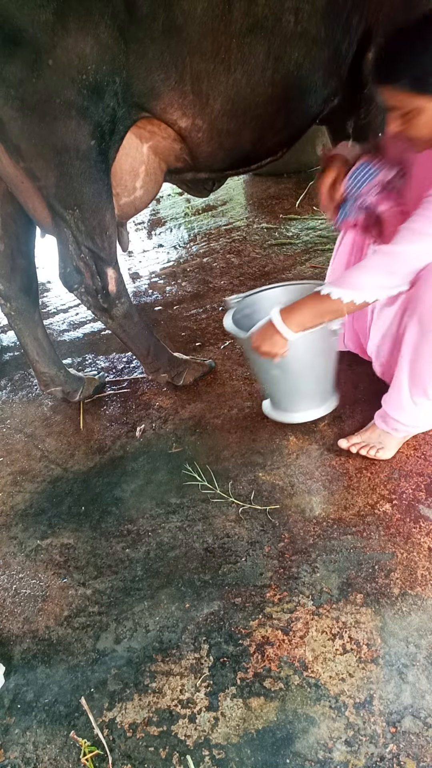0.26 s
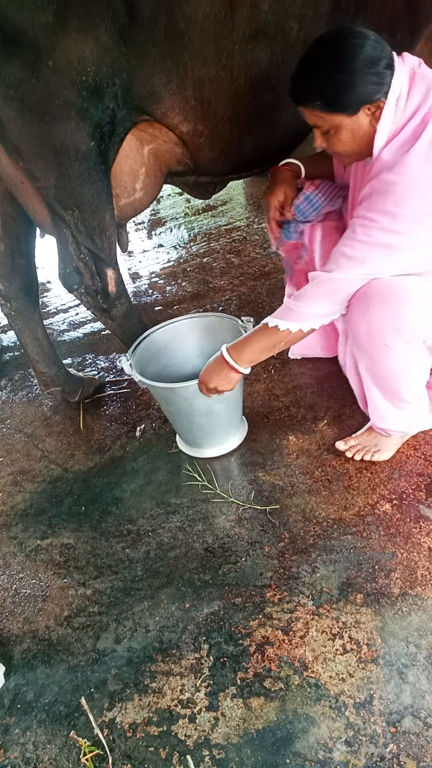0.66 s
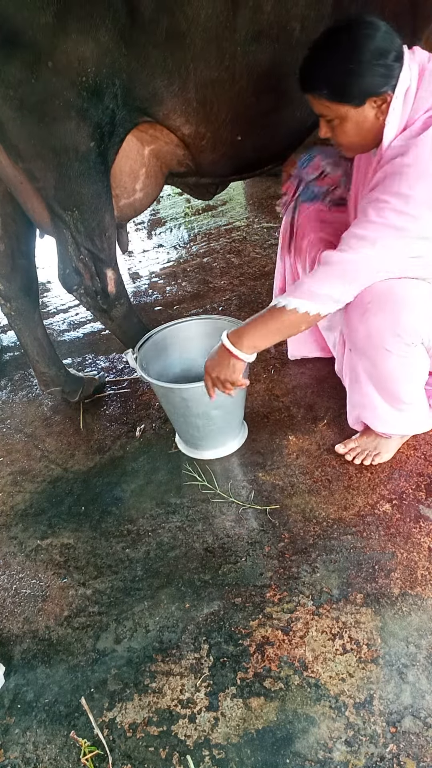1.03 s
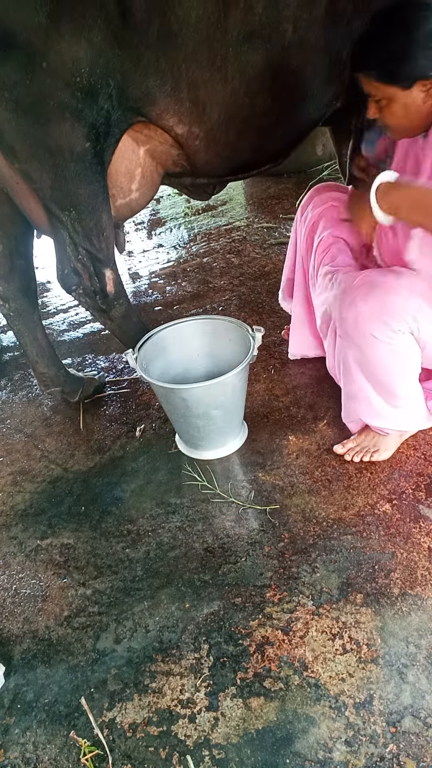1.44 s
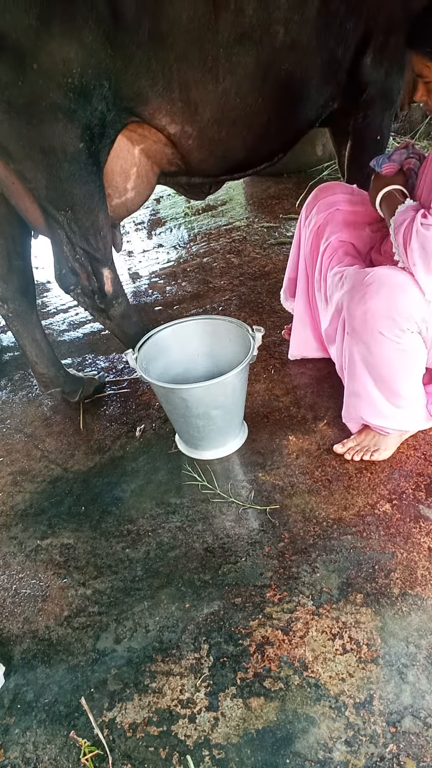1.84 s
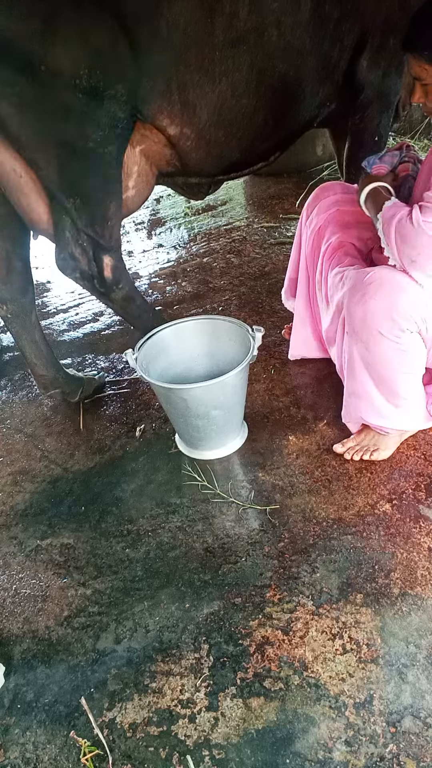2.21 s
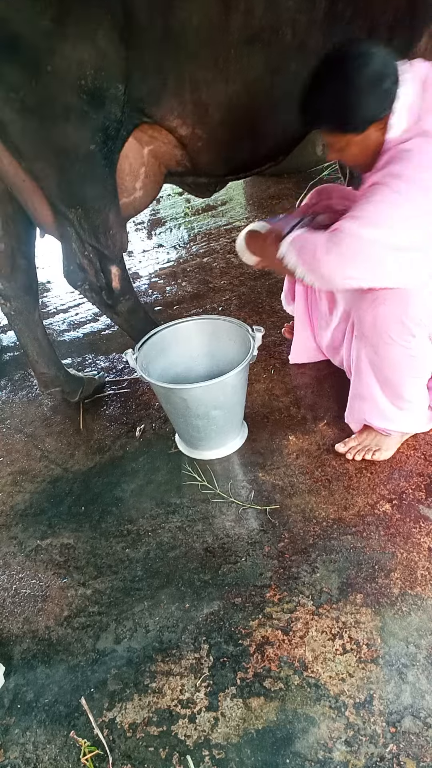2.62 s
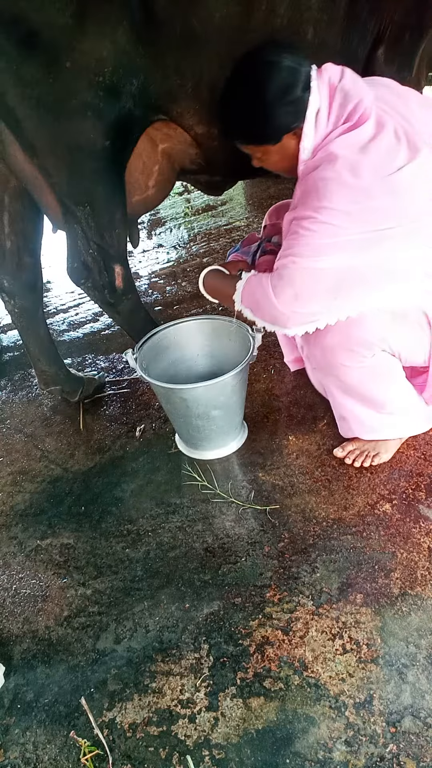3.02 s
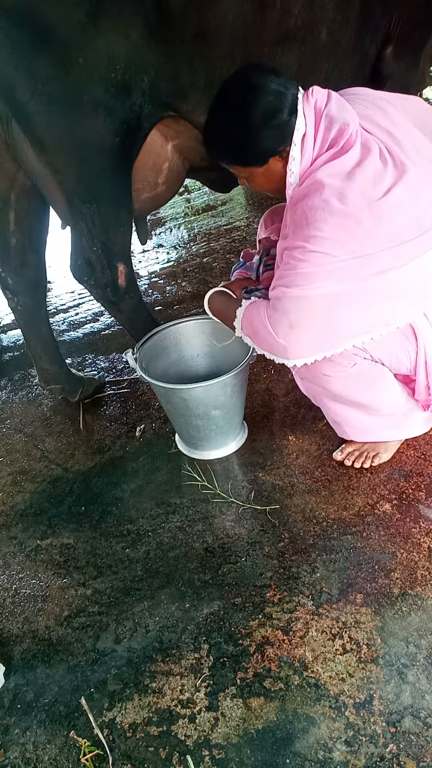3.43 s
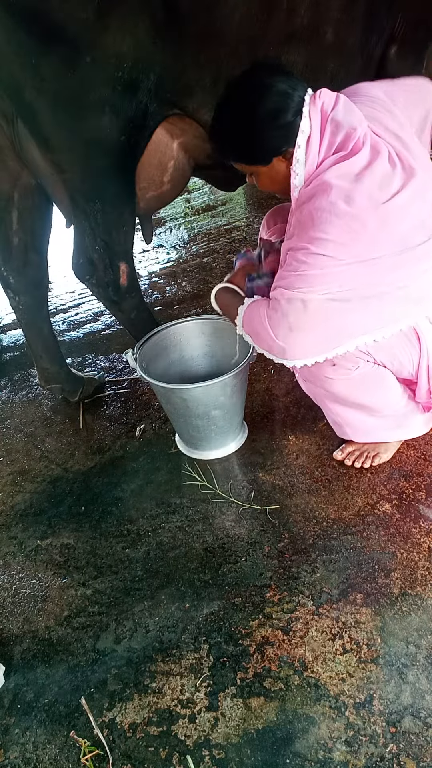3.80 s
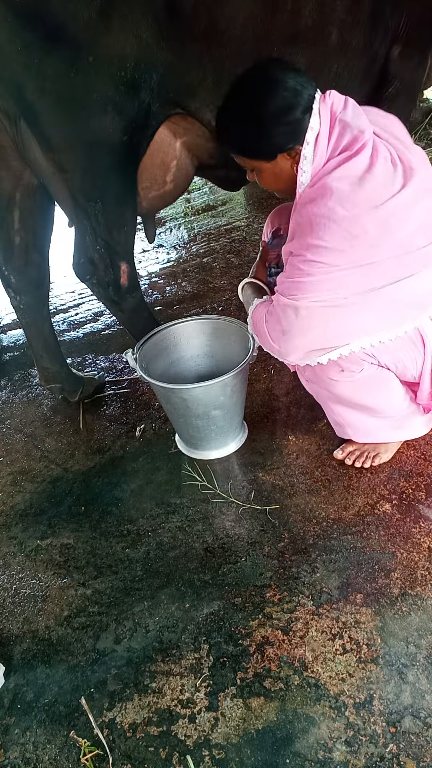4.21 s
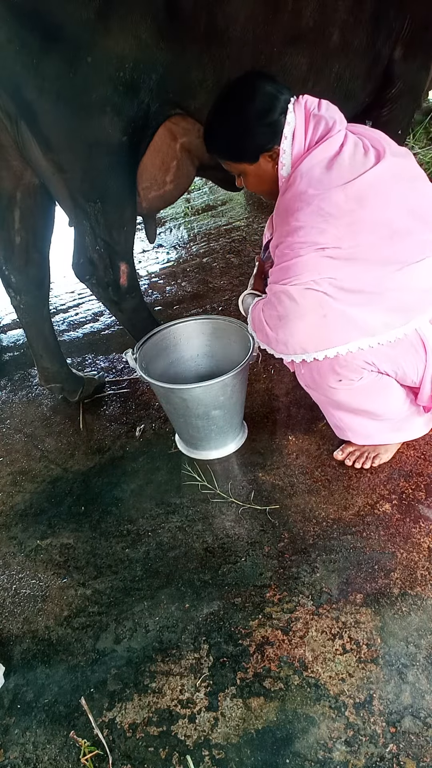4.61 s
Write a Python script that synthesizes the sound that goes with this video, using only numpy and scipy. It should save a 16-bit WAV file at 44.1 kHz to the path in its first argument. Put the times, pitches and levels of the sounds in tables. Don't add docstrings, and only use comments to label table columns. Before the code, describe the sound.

A close, mono phone pickup in an open animal shed with a wet stone floor and faint, patchy air noise. Around 0.2 s a thin steel pail touches down with soft, hand-damped metallic taps. A wooden stool knocks sharply at 0.36 s, then drags in a stuttering, hollow groan with gritty scraping and knocks until about 0.65 s. At 0.74 s the pail drops with a hard, bright clang, strikes strongly again near 0.95 s, and rocks with diminishing clanks until 1.5 s. From 1.6 to 2.8 s it is quiet: tiny bangle ticks, cloth rustle, faint scuffs and soft low thumps of shifting weight. From about 2.97 to 3.45 s the wood groans and judders again with several knocks, duller and without the big metal clang. Afterwards only faint scrapes, ticks and soft bumps remain, with a small shuffle at 4.3 to 4.7 s.

```python
import sys
import numpy as np
from scipy import signal
from scipy.fft import rfft, irfft, next_fast_len
from scipy.io import wavfile
from scipy.ndimage import uniform_filter1d, map_coordinates

SR = 44100
rng = np.random.default_rng(int(sys.argv[2]) if len(sys.argv) > 2 else 0)


def invert_db(level):
    return 10 ** (np.asarray(level, dtype=float) / 20)


def wav_out(sig):
    wavfile.write(sys.argv[1], SR, np.round(np.clip(np.atleast_2d(sig).T, -1, 1) * 32767).astype(np.int16))


N = 214142

# t/s, clang level/dB, boom/dB over it, edge/dB over it, thud f/Hz
PAIL_LANDING = [
    (0.1785, -37.5, 3, -0.5, 325),
    (0.1974, -44, 23, -16, 206),
    (0.2154, -35.5, 19, -9, 293),
    (0.2394, -48.5, 22.5, -4, 335),
    (0.738, -15, 8, -4, 351),
    (0.7445, -6.5, 3, -8.5, 718),
    (0.7574, -24, 4, -31, 322),
    (0.8344, -29.5, 4, -25, 324),
]
# t/s, clang level/dB, boom/dB over it, edge/dB over it, thud f/Hz
PAIL_ROCKING = [(0.9421, -24, 16, -28, 489), (0.9483, -7.5, -10, -2, 435), (0.9576, -19.5, 11.5, -29, 454),
                (1.0294, -30, 6, 3.5, 436), (1.067, -16.5, 2, -34, 410), (1.0698, -22.5, 5.5, -6, 317),
                (1.0795, -19, 0, -2.5, 340), (1.1744, -26, 4.5, -12, 268), (1.1864, -23.5, 3.5, -4, 372),
                (1.219, -30, 9, -20, 330), (1.2972, -36.5, 13.5, -28, 344), (1.3172, -36.5, 12, -29, 327),
                (1.3433, -58, 33, -24, 322), (1.3842, -43, 17.5, -26, 292), (1.4592, -38, 5.5, -4, 353)]
# f/Hz, level/dB, t60/s
WALL_HELD = [(339, -2, 0.33), (732, -7, 0.34), (845, -5, 0.19), (1100, -6, 0.12), (1292, -20, 0.29),
             (1400, -5, 0.097), (1674, -15, 0.27), (1960, -16, 0.17), (2358, -12, 0.25), (2778, -11, 0.2),
             (2923, -12, 0.18), (3133, -18, 0.3), (3300, -12, 0.23), (3461, -25, 0.39), (3601, -11, 0.19),
             (4032, -13, 0.14), (4258, -14, 0.12), (4603, -22, 0.2), (4732, -21, 0.2), (4861, -13, 0.089),
             (5098, -27, 0.28), (5809, -26, 0.2)]
WALL_FREE = [(329, -8, .4), (364, -14, .3), (465, -9, .22), (1023, -21, .3), (812, -21, .22),
             (847, -17, .3), (1099, -12, .22), (1380, -20, .3), (1464, -23, .25), (1671, -17, .22),
             (1922, -21, .25), (1992, -17, .2), (2120, -16, .12), (2345, -14, .18), (2621, -13, .2),
             (2826, -20, .22), (2885, -21, .2), (3009, -23, .25), (3230, -19, .18), (3300, -21, .18),
             (3709, -22, .12), (3876, -21, .2), (4124, -20, .12), (4215, -25, .17)]
# f/Hz, level/dB per Hz
CLANG_HELD = [(88, -65), (150, -16), (335, 16.5), (548, 1), (735, -1.5), (1020, -24), (1080, -22),
              (1540, -25.5), (1640, -37), (3240, -15.5), (6000, -31.5), (7800, -68), (13200, -120)]
CLANG_FREE = [(88, -52), (150, -25.5), (463, -11.5), (611, -32.5), (832, -14.5), (941, -38), (1100, -15),
              (1210, -34), (2380, -19.5), (4020, -24), (6000, -33), (7800, -59), (13200, -120)]
# f/Hz, t60/s
STEEL_T60 = [(200, 0.32), (1000, 0.37), (3000, 0.19), (8000, 0.18), (15000, 0.18)]
# f/Hz, t60/s
WOOD_T60 = [(200, 0.2), (1000, 0.23), (3000, 0.14), (8000, 0.072), (15000, 0.14)]
# f/Hz, level/dB per Hz
SPARK = [(2650, 23), (4500, 0), (5360, -1.5), (6460, -3.5), (7800, -3.5), (8830, 4), (10000, -14.5),
         (12400, -18), (13400, -13), (16000, -13)]
# t/s, crack level/dB, boom/dB
# over it, edge/dB over it, thud f/Hz
LEGS = [(0.2602, -17.5, -1.5, -18, 324), (0.3588, -4, 1.5, -22.5, 606), (0.4255, -26.5, 10, -10, 634),
        (0.4544, -16.5, -18, -11, 600), (0.4725, -13.5, -18, -11, 570), (0.4974, -14, -18, -9.5, 506),
        (0.5442, -17, 0, -7.5, 592), (0.6008, -21, 1, -11, 585), (0.6257, -17.5, 7.5, -10.5, 596),
        (0.6494, -28.5, -18, -9, 660),
        (2.8001, -34, 7, -22, 438), (2.9675, -56, 16, -22, 600), (3.0153, -44, 21, -23, 544),
              (3.0696, -11, 4, -38, 607), (3.078, -18, -9, -34, 680), (3.0926, -25, -6, -34, 596),
              (3.0997, -22, 7, -26, 592), (3.107, -20.5, 16, -24, 565), (3.1814, -12.5, -2, -16, 648),
              (3.244, -20.5, -3, -9, 377), (3.276, -13, -6, -15.5, 792), (3.3317, -42, 18.5, 2, 245),
              (3.4094, -40.5, 15, -7, 762), (3.4244, -47, 25.5, -29, 698), (3.5901, -29.5, 2, -19, 236),
              (4.4545, -25.5, -1.5, -3.5, 660), (4.6905, -39, 11.5, -4, 232)]
# f/Hz, level/dB per Hz
KNOCK = [(88, -51), (150, -21), (231, -33), (367, 3.5), (621, -3), (1050, -4), (1500, -14.5), (2130, -8),
         (4990, -36.5), (6000, -68), (7800, -68), (13200, -120)]
# f/Hz, width/Hz, level/dB
SEAT = [(223.5, 13, -13.5), (592, 110, -1.5), (955, 19, -1), (2206, 13, 20.5), (2500, 99, -38),
        (3620, 31, -19)]
# f/Hz, level/dB per Hz
SCRAPE = [(530, -24), (900, 18), (974, -39), (1240, 6), (2470, -5.5), (3850, -7.5), (4920, -25.5),
          (6000, -68), (7800, -64), (13200, -120)]
# start t/s,
# hold/s, scrape level/dB, groan/dB over it, rumble/dB over it
STROKES = [(0.216, 0.018, -35, -24, 10.5), (0.279, 0.009, -35, -16, -20), (0.372, 0.11, -28, 4, -5),
           (0.482, 0.067, -20, 3.5, -0.5), (0.617, 0.042, -24, 5.5, -5.5), (0.035, 0.032, -49, -7, 7),
           (1.975, 0.064, -43.5, -9, -11), (2.192, 0.023, -43.5, -3, -17), (2.29, 0.029, -47, -16, -13),
           (2.65, 0.085, -57.5, 7.5, 15), (3.827, 0.054, -44.5, -9, -10), (4.024, 0.082, -45, -2, -11),
           (1.668, 0.029, -41.5, -5, -6), (2.42, 0.015, -41, -21, -22), (2.795, 0.069, -47.5, 10, 6.5),
           (2.978, 0.016, -38, 13.5, 3), (3.01, 0.055, -28, 10, -9), (3.083, 0.072, -27, 13, -4),
           (3.223, 0.027, -26.5, -18, -2), (3.287, 0.0075, -36.5, 5, 5), (3.314, 0.11, -45, -28, -1),
           (3.409, 0.011, -43.5, 10, 18.5), (3.446, 0.088, -54.5, 5, 17), (3.609, 0.053, -41, -2, 10),
           (3.933, 0.011, -34.5, -5.5, -5.5), (4.275, 0.064, -44, 10, -13), (4.388, 0.059, -51.5, 10, 17),
           (4.552, 0.0066, -44, 5.5, -6)]
# t/s, level/dB, f/Hz
JOLTS = [(0.3737, -23, 706), (0.3842, -31, 720), (0.3918, -32, 800), (0.3978, -17, 935),
         (0.407, -25, 590), (0.4233, -20, 635), (0.429, -32, 636.0), (0.4376, -28, 670),
         (0.4511, -29, 673.0), (0.4582, -21, 760), (0.4639, -14, 630), (0.473, -12, 575),
         (0.4836, -11.5, 617), (0.4933, -13, 730), (0.4978, -7, 630), (0.5032, -6.5, 480),
         (0.5092, -16, 705), (0.5176, -10.5, 520), (0.5247, -22, 650), (0.5307, -12, 610),
         (0.5361, -16, 700), (0.5414, -8, 553), (0.5497, -6, 577), (0.5557, -33, 547),
         (0.5612, -15, 655), (0.5663, -17, 660), (0.571, -27, 585), (0.5789, -16.5, 435),
         (0.5887, -19, 567), (0.5994, -14.5, 800), (0.6043, -25, 674), (0.61, -27, 780),
         (0.6154, -16, 656), (0.624, -18, 740), (0.6312, -28, 680), (0.6389, -17, 667),
         (0.6462, -19, 580), (0.6523, -25, 590), (0.6584, -20, 620),
         (2.967, -11, 535), (2.9743, -15.5, 640), (2.9791, -22, 603), (2.9889, -12.5, 464),
               (2.9945, -12, 608), (3.0056, -9.5, 510), (3.0147, -8, 563), (3.0202, -3.5, 586),
               (3.0262, -8, 536), (3.0317, -11, 656), (3.0365, -6, 584), (3.0437, -5.5, 597),
               (3.0521, -11.5, 620), (3.0621, -10.5, 640), (3.0685, -3.5, 580), (3.0763, -12.5, 813),
               (3.0847, -9, 695), (3.0907, -1, 550), (3.0983, -14, 660), (3.1069, -6, 560),
               (3.1154, -18, 596), (3.1211, -16, 620), (3.1288, -13, 654), (3.1344, -9, 800),
               (3.1397, -15, 680), (3.1473, -9, 628), (3.1539, -23, 765), (3.1932, -19, 760),
               (3.2076, -35, 670), (3.218, -34, 830), (3.2247, -19, 606), (3.2351, -23, 730),
               (3.2429, -21, 800), (3.2538, -25, 505), (3.2594, -20, 544), (3.2673, -32, 543),
               (3.4114, -21.5, 610), (3.418, -22.5, 660), (3.4233, -20, 574), (3.4367, -32, 527),
         (4.276, -37, 600), (4.2809, -41, 800), (4.2912, -29, 620), (4.297, -31, 590),
              (4.3114, -36, 594), (4.326, -32, 630), (4.3337, -36, 693), (4.3771, -33, 630),
              (4.3947, -26.5, 533), (4.3993, -26.5, 483), (4.409, -33, 526), (4.414, -35, 460),
              (4.426, -33, 387), (2.801, -35, 640), (2.81, -34, 503), (2.826, -37, 580),
              (3.622, -26.5, 533), (3.639, -26, 417)]
# t/s, level/dB, f/Hz
STOOL_ROCKS = [(0.499, -45, 264), (0.529, -24.5, 135), (.543, -24, 211), (2.969, -35, 215),
               (2.99, -32, 220), (3.015, -23, 202), (3.047, -21, 200), (3.078, -27.5, 205),
               (3.098, -16, 206), (3.112, -20, 212), (3.149, -28, 216), (3.008, -15.5, 380.6),
               (3.03, -23, 383), (3.099, -19.5, 333), (3.249, -22.5, 382)]
# t/s, level/dB, f/Hz
SNAPS = [(.3604, -2, 680), (.6262, -9, 1000), (.4856, -10, 1300), (.4992, -10, 1000), (.6009, -14, 1400),
         (3.2443, -17, 1800), (3.2767, -15, 1800), (.9493, -7, 520), (1.0714, -14, 400), (.95, -12, 3000),
         (1.7193, -42, 13000), (1.7712, -45, 11000), (2.5415, -44, 14500), (1.851, -46, 6000),
         (3.0681, -41, 6500), (3.1035, -40, 6500), (3.2756, -28, 9000)]
# t/s, level/dB, f/Hz, t60/s
CLEAR_TONES = [(1.074, -21, 331, .3), (1.066, -30, 560, .15), (.7372, -11, 735, .1), (.18, -38, 835, .4),
               (.178, -42, 2400, .3), (2.685, -53, 1980, .9), (.211, -27, 820, .2), (1.028, -34, 6000, .05),
               (1.029, -39, 7100, .04), (1.032, -36, 4570, .08), (3.44, -40, 248, .5), (1.21, -43, 1098, .9),
               (1.3, -40, 807, .25)]
# t/s, level/dB, f/Hz
TICKS = [(0.135, -39, 9130), (0.236, -25, 8600), (0.519, -27, 15500), (0.746, -32, 5270),
         (1.029, -29, 6050), (1.649, -37.5, 8200), (1.7174, -39, 8900), (1.8132, -33.5, 8690),
         (1.8962, -32, 9600), (1.9634, -41, 15000), (1.896, -30, 15100), (2.191, -31.5, 15500),
         (2.304, -38, 8550), (2.541, -37, 15200), (2.576, -40.5, 8560), (3.1823, -20.5, 15000),
         (3.277, -35, 5230), (3.812, -34, 8400), (3.9377, -34.5, 8490), (4.381, -37, 12000),
         (4.6912, -55, 8600)]
# t/s, level/dB, f/Hz
HOOVES = [(0.016, -30, 93), (0.146, -33, 79), (0.42, -28.5, 132), (0.518, -25, 160), (0.593, -24.5, 181),
          (1.063, -21, 212), (1.16, -28, 198), (1.247, -25.5, 242), (1.654, -40, 107), (1.888, -37, 66),
          (1.972, -36.5, 108), (2.006, -37, 72), (2.1, -47, 72), (2.303, -37, 80.7), (2.879, -49, 77),
          (3.276, -29.5, 115), (3.329, -37, 61.9), (3.39, -33, 100), (3.597, -42, 220), (3.625, -41, 231),
          (4.02, -41.5, 431), (4.064, -41, 252), (2.098, -40, 276), (1.841, -42, 142), (0.278, -31, 337),
          (0.627, -31.5, 87), (1.169, -40, 66), (3.288, -27, 251), (3.345, -28, 245), (2.893, -39, 302),
          (3.864, -31, 74), (4.314, -43, 110), (4.38, -34.5, 106), (4.689, -34.5, 169)]
# t/s, level/dB
STIR = [(0.0, 4.5), (0.16, 3), (0.9, 1.5), (1.5, -1), (1.7, -0.5), (1.838, 0), (1.968, 0.5), (2.112, -1),
        (2.318, 1.5), (2.566, -1), (2.75, 4), (2.95, -0.5), (3.75, 0), (3.894, 1), (4.128, -2.5),
        (4.306, -2), (4.45, 2), (4.856, 2)]
# f/Hz, level/dB per Hz
AIR = [(15, -41), (25, -32), (59, -0.5), (97, 1.5), (170, -11), (335, -7.5), (677, -12.5), (887, -14),
       (1160, -15), (2840, -9.5), (6560, -30), (7800, -24), (8830, -15.5), (9700, -26.5), (11800, -30.5),
       (14800, -22), (16000, -17.5)]
# level/dB, share of the stir followed
SHED_LAYERS = [
    (-58.5, 0.57),
    (-52, 0.45),
    (-60, 0.74),
    (-60, 1.33),
]

LOW_TOP_HZ, MID_TOP_HZ, HIGH_TOP_HZ = 1300, 5000, 18000


def unit(x):
    return x / np.sqrt(np.mean(x ** 2) + 1e-20)


def along(points, hz):
    f, v = np.transpose(points)
    return np.interp(np.log(hz + 1), np.log(f + 1), v)


def wobble(rate):
    return map_coordinates(rng.standard_normal(int(N * rate / SR) + 4), [np.arange(N) * rate / SR])


def filtered(x, response):
    m = next_fast_len(len(x) + 8192)
    return irfft(rfft(x, m) * response(np.fft.rfftfreq(m, 1 / SR)), m)[:len(x)]


def band(hz, lo_hz, hi_hz):
    return 1 / np.sqrt((1 + (lo_hz / (hz + 1)) ** 6) * (1 + (hz / hi_hz) ** 6))


def place(out, s, sound):
    out[round(s * SR):][:len(sound)] += sound


def ring_modes(t, modes, ring_db, boom_db):
    out = np.zeros(len(t))
    chances = rng.standard_normal((len(modes), 3))
    for (f, level, t60), (luck, turn, split) in zip(modes, chances):
        beat = 1 + 0.3 * np.cos(2 * np.pi * 0.008 * f * split * t + 3 * turn)
        boom = (0.78 * boom_db - 3.5) * (f < LOW_TOP_HZ)
        strength_db = ring_db + level + boom + 2 * luck
        drifted_hz = f * (1 + 0.001 * turn)
        out += invert_db(strength_db - 60 * t / min(t60, 0.4)) * beat * np.sin(2 * np.pi * drifted_hz * t)
    return out


def blows(events, modes, colour, t60s, ring_db, dense_db, crack_db, thud_db, thud_t60, damping,
          low_db, high_db, snap_db, snap_hz, contact_s):
    out, t = np.zeros(N + SR), np.arange(SR // 3) / SR
    mode_gap_hz = 45
    crowd = rng.standard_normal(SR // mode_gap_hz)

    def coloured(white, shape, lo, hi):
        def response(hz):
            modal_db = 3 * map_coordinates(crowd, [hz / mode_gap_hz]) * (hz > LOW_TOP_HZ)
            return invert_db(along(shape, hz) + modal_db) * band(hz, lo, hi)
        return unit(filtered(white, response))

    u = 2 * np.pi * snap_hz * t - np.pi
    snap = -invert_db(snap_db) * u * np.exp(-u ** 2 / 2)
    for s, db, boom_db, edge_db, thud_hz in events:
        white = rng.standard_normal(len(t))
        low = invert_db(low_db + boom_db) * coloured(white, colour, 60, LOW_TOP_HZ)
        mid = coloured(white, colour, LOW_TOP_HZ, MID_TOP_HZ)
        high = invert_db(high_db + edge_db) * coloured(white, SPARK, MID_TOP_HZ, HIGH_TOP_HZ)

        hz, when, z = signal.stft(low + mid + high, SR, nperseg=128)
        decay = invert_db(-60 * when / along(t60s, hz)[:, None])
        dense = signal.istft(z * decay, SR, nperseg=128)[1][:len(t)]

        thud_fall_db = 60 * t / thud_t60 * (thud_hz / 330) ** damping
        thud = invert_db(thud_db + boom_db - thud_fall_db) * np.sin(2 * np.pi * thud_hz * t)
        sound = invert_db(dense_db) * dense + thud + ring_modes(t, modes, ring_db, boom_db)

        contact = contact_s * invert_db(0.082 * boom_db)
        rise = 1 - np.exp(-t / max(contact, 1e-4))
        crack = invert_db(crack_db - 60 * t / 0.0096) * (mid + high) * np.minimum(t / 0.0006, 1)
        place(out, s, invert_db(db) * (sound * rise + crack + snap))
    return out[:N]


def pail():
    held = blows(PAIL_LANDING, WALL_HELD, CLANG_HELD, STEEL_T60, ring_db=-12.5, dense_db=-17,
                 crack_db=-15.5, thud_db=2.5, thud_t60=0.063, damping=0, low_db=0.5, high_db=7.5,
                 snap_db=-15, snap_hz=1470, contact_s=0.0011)
    free = blows(PAIL_ROCKING, WALL_FREE, CLANG_FREE, STEEL_T60, ring_db=-4, dense_db=-18.5,
                 crack_db=-16.5, thud_db=1.0, thud_t60=0.1, damping=0.81, low_db=4.5, high_db=3.5,
                 snap_db=-23, snap_hz=1480, contact_s=0.0013)
    return held + free


def stool_knocks():
    return blows(LEGS, [], KNOCK, WOOD_T60, ring_db=0, dense_db=-14.5,
                 crack_db=-9.5, thud_db=-8.0, thud_t60=0.14, damping=0, low_db=-4.5, high_db=4.5,
                 snap_db=-4.5, snap_hz=1130, contact_s=0.0014)


def slips(rate, spread_db):
    chance, size = rng.random(N), rng.exponential(size=N)
    return (chance < rate / SR) * invert_db(spread_db * size) * rng.standard_normal(N)


def seat_response(f):
    total = 0
    for k, (centre, width, db) in enumerate(SEAT):
        resonance = 1j * f * width / (centre * centre - f * f + 1j * f * width)
        total = total + (-1) ** k * invert_db(db) * resonance
    return total


def pressure():
    t, force = np.arange(N) / SR, np.zeros((4, N))
    for s, hold, db, groan_db, rumble_db in STROKES:
        press_db = 906 * (t - s)
        ease_db = 333.5 * (s + hold - t)
        shape_db = np.minimum(0, np.minimum(press_db, ease_db))
        force += invert_db(db - 8.0 + shape_db) * invert_db([[groan_db], [rumble_db], [0], [-15]])
    return uniform_filter1d(force, size=130, axis=1)


def stool_drag():
    judder = unit(slips(700, 0.99)) + 1.18 * rng.standard_normal(N)
    groan = unit(filtered(judder, lambda hz: (seat_response(hz) + 0.56) * band(hz, 480, 580)))
    rumble = unit(filtered(judder, lambda hz: (seat_response(hz) + 0.057) * band(hz, 145, 245)))

    grit = unit(slips(2500, 2.5)) + 0.98 * rng.standard_normal(N)
    grit = grit * invert_db(3 * wobble(90))
    scrape = unit(filtered(grit, lambda hz: invert_db(along(SCRAPE, hz)) * band(hz, LOW_TOP_HZ, MID_TOP_HZ)))
    fine = unit(filtered(np.tanh(grit / 4),
                         lambda hz: invert_db(along(SPARK, hz)) * band(hz, MID_TOP_HZ, HIGH_TOP_HZ)))
    return (pressure() * [groan, rumble, scrape, fine]).sum(axis=0)


def jolts():
    out, t = np.zeros(N + SR), np.arange(SR // 10) / SR
    fade = invert_db(0.5 - 60 * t / 0.028) * (1 - np.exp(-t / 0.001))
    for s, db, hz in JOLTS:
        upper = invert_db(-11.5) * np.sin(2 * np.pi * 1.65 * hz * t)
        place(out, s, invert_db(db) * fade * (np.sin(2 * np.pi * hz * t) + upper))
    return out[:N]


def soft_pushes(events):
    out, t = np.zeros(N + SR), np.arange(SR // 3) / SR
    swell = 1 - np.exp(-t / 0.0081)
    for s, db, hz in events:
        place(out, s, invert_db(db + 5.0 - 60 * t / 0.11) * swell * np.sin(2 * np.pi * hz * t))
    return out[:N]


def stool_rocking():
    return soft_pushes(STOOL_ROCKS)


def snaps():
    t, out = np.arange(N) / SR, np.zeros(N)
    for s, db, hz in SNAPS:
        u = np.clip(2 * np.pi * hz * (t - s), -20, 20)
        out -= invert_db(db + 2) * np.sin(u) * np.exp(-u ** 2 / 12)
    return out


def clear_tones():
    t, out = np.arange(N) / SR, np.zeros(N)
    for s, db, hz, t60 in CLEAR_TONES:
        gate = np.clip(np.minimum(t - s, s + 0.22 - t) / 0.0015, 0, 1)
        decay = invert_db(db - 60 * np.maximum(t - s, 0) / t60)
        out += gate * decay * np.sin(2 * np.pi * hz * (t - s))
    return out


def ticks():
    out, t = np.zeros(N + SR), np.arange(SR // 4) / SR
    rise = 1 - np.exp(-t / 0.00055)
    for s, db, pitch_hz in TICKS:
        def shape(hz):
            peak = 0.24 + band(hz, pitch_hz * 0.87, pitch_hz * 1.15)
            return invert_db(along(AIR, hz)) * peak * band(hz, 2700, 16000)
        burst = unit(filtered(rng.standard_normal(len(t)), shape))
        place(out, s, invert_db(db - 15.5 - 60 * t / 0.29) * rise * burst)
    return out[:N]


def hooves():
    return soft_pushes(HOOVES)


def shed():
    z = signal.stft(rng.standard_normal(N), nperseg=512)[2]
    field = uniform_filter1d(rng.standard_normal(z.shape), size=8, axis=0)
    field = uniform_filter1d(field, size=10, axis=1)
    air = signal.istft(z * invert_db(unit(field)), nperseg=512)[1][:N]

    stir_db = np.interp(np.arange(N) / SR, *np.transpose(STIR))
    shared_db = 0.7 * wobble(12)
    edges_hz = [(20, 160), (160, 1300), (1300, 5500), (5500, 18000)]
    out = np.zeros(N)
    for (level_db, follow), edge, own_db in zip(SHED_LAYERS, edges_hz, (2, 1, 0.6, 1.2)):
        layer = unit(filtered(air, lambda hz: invert_db(along(AIR, hz)) * band(hz, *edge)))
        out += invert_db(level_db + follow * stir_db + shared_db + own_db * wobble(23.1)) * layer
    return out


def scene():
    stool = stool_knocks() + stool_drag() + jolts() + stool_rocking()
    return (pail() + stool + snaps() + clear_tones() + ticks() + hooves() + shed())[None]


def top_cut(x):
    return signal.sosfilt(signal.butter(12, 16680, fs=SR, output="sos"), x)


def record(dry):
    mic = dry[0] / (1 + (dry[0] / 0.9) ** 8) ** (1 / 8)
    mic = filtered(mic, lambda hz: band(hz, 40, SR) * (hz < 15850))
    return top_cut(mic[None])


dry = scene()
out = record(dry)
wav_out(out)
```